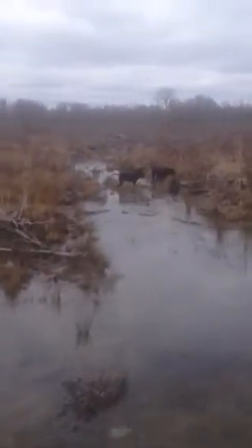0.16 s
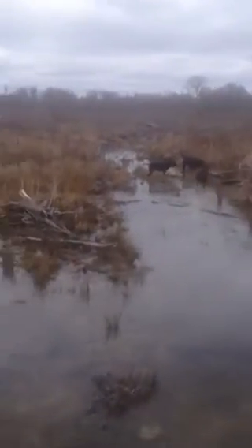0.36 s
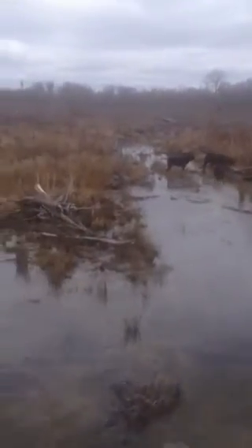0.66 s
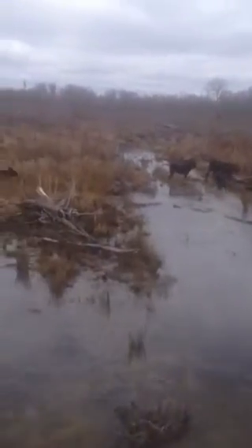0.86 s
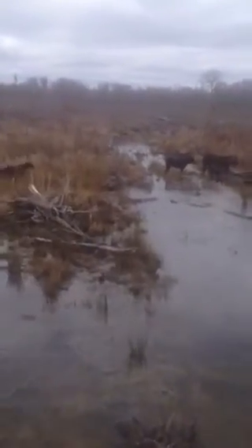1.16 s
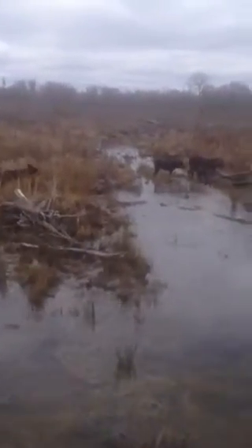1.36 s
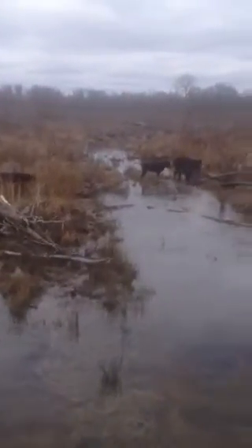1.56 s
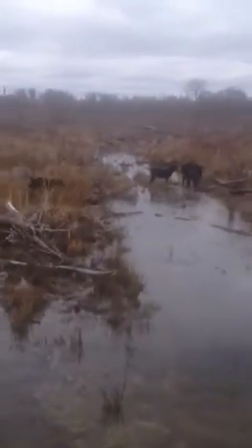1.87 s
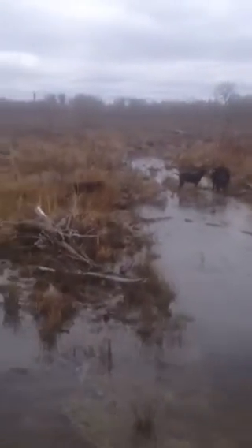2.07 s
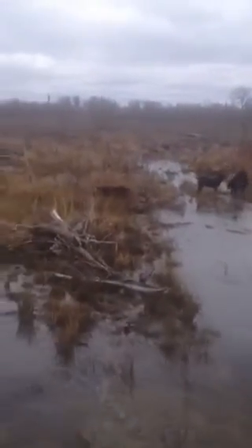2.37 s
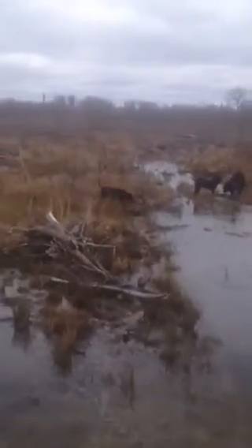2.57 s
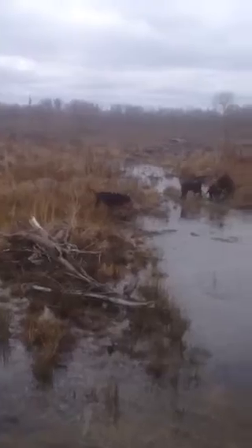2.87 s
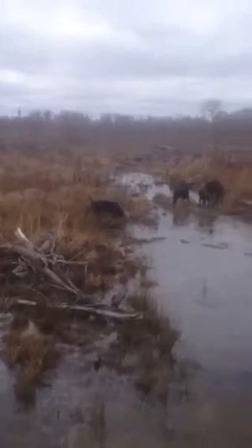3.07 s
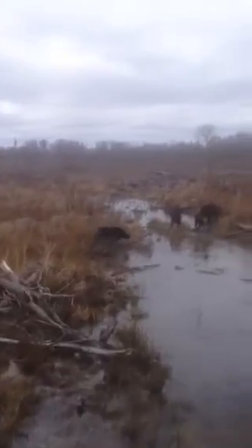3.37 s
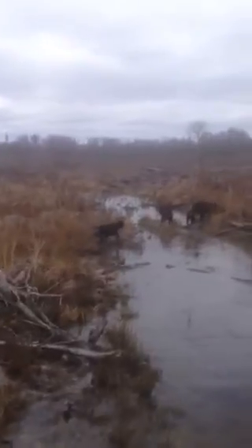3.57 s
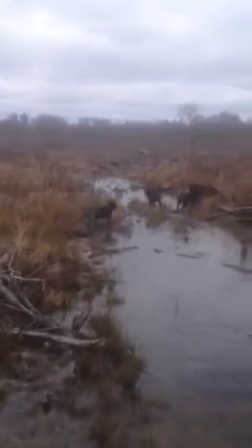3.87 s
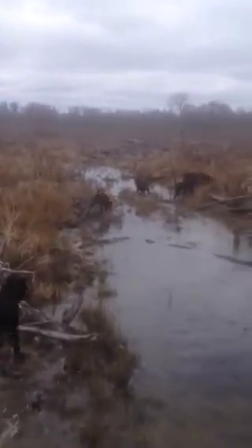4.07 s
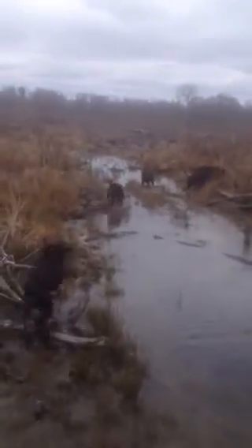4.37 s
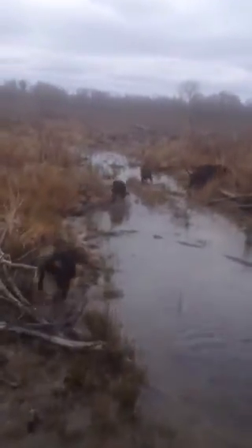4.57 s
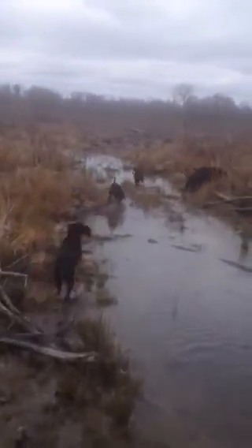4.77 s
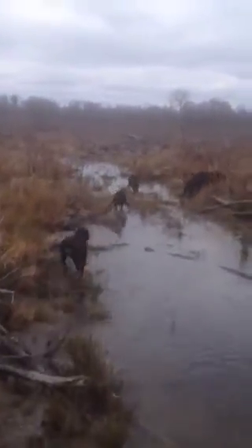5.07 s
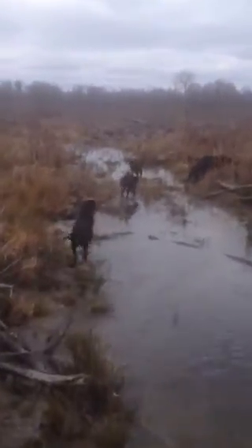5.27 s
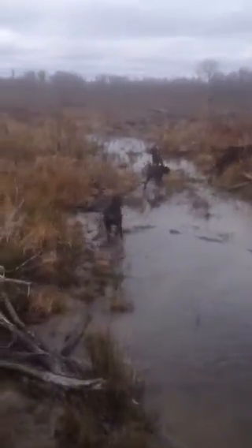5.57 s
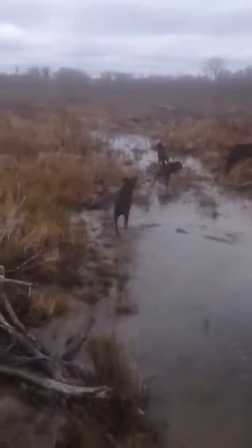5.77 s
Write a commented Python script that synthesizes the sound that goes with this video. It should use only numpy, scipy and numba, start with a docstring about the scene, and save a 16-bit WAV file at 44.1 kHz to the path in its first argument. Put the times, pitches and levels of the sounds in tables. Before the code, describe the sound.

Shallow water sloshes, plops and splashes under dogs' legs, swelling midway then easing, beneath a continuous shrill chorus of frogs.

```python
"""Frogs trill over softly sloshing water, then splashes grow as young dogs wade in a shallow marsh.
Churned water is banded noise that shifts with the legs, with small rising tones for bubbles and drops.
Trapped air plops as short ringing tones, and slaps of water are bursts of ragged coloured noise.
Frogs near and far call in rows of short pips around 3 kHz, like a nail drawn along a comb.
The upper partials of the far chorus blur into a faint steady band of noise just below 5 kHz."""
import sys
import numpy as np
from scipy import signal
from scipy.io import wavfile
from scipy.ndimage import uniform_filter1d
from numba import njit

SR = 44100
rng = np.random.default_rng(int(sys.argv[2]) if len(sys.argv) > 2 else 0)


def gain_from_db(level_db):
    """Turn a decibel level (scalar or array-like) into a linear amplitude factor."""
    decades = np.asarray(level_db, float) / 20
    return 10 ** decades


def persist_wave(psi):
    """Save psi, clipped to +-1, as 16-bit WAV."""
    counts = np.round(np.clip(psi, -1, 1) * 32767).astype(np.int16)
    wavfile.write(sys.argv[1], SR, np.atleast_2d(counts).T)


N = 261513  # length of the scene in samples
TIME = np.arange(N) / SR


@njit
def grains(at, size, hz, rise, glide, turn, power):
    """Short tones that swell to a peak at their time, die away and slide in pitch."""
    out = np.zeros(N)
    for k in range(len(at)):
        start = int((at[k] - rise[k]) * SR)
        phase = turn[k]
        for i in range(int(rise[k] * SR * (1 + 9 / np.sqrt(power)))):
            u = i / (rise[k] * SR)  # 0 at the start, 1 at the peak
            phase += 2 * np.pi * hz[k] * (1 + glide[k] * (u - 1)) / SR
            if 0 <= start + i < N:
                out[start + i] += size[k] * (u * np.exp(1 - u)) ** power * np.sin(phase)
    return out


def tones(at, db, hz, rise, glide, power):
    """Grains from plain columns, each at a chance phase; a higher power makes them shorter."""
    turn = 2 * np.pi * rng.random(len(at))
    columns = np.broadcast_arrays(at, gain_from_db(db), hz, rise, glide, turn)
    return grains(*(np.array(c, float) for c in columns), float(power))


def band(x, lo_hz, hi_hz):
    """Band-pass: keeps the sound between two pitches."""
    return signal.sosfilt(signal.butter(2, [lo_hz, min(hi_hz, .45 * SR)], "band", fs=SR, output="sos"), x)


def walk(rate):
    """Random levels, rate of them a second, smoothed twice into a wandering curve; spread near 1."""
    hold = int(SR / rate)
    steps = np.repeat(rng.standard_normal(N // hold + 1), hold)
    return 1.4 * uniform_filter1d(uniform_filter1d(steps, hold), hold)[:N]


def reeds(x, decay_s, wet_db):
    """Reeds and brush scatter the sound: a short dying tail of noise smears it."""
    t = TIME[:12000]
    tail = rng.standard_normal(len(t)) * np.exp(-t / decay_s) * (t > .002)
    tail = tail / np.sqrt(np.sum(tail ** 2))
    return x + gain_from_db(wet_db) * signal.fftconvolve(x, tail)[:N]


# How hard the legs churn the water. Each row: time in seconds, strength in dB.
CHURNING = [(0, -56.5), (.1, -63), (.38, -58), (.46, -49), (.87, -51.5), (.9, -60.5), (1.08, -61),
            (1.3, -56.5), (1.37, -48.5), (1.65, -51.5), (1.7, -61), (1.95, -61), (1.99, -55), (2.2, -51.5),
            (2.38, -47), (2.48, -55), (2.6, -50), (2.88, -46.5), (2.95, -43), (3.12, -41), (3.22, -48),
            (3.32, -44), (3.41, -50.5), (3.47, -43), (3.55, -44), (3.6, -50.5), (3.65, -44), (4.15, -45),
            (4.3, -55), (4.45, -59), (4.62, -61), (4.75, -47.5), (4.92, -50), (5.2, -64.5), (5.45, -63.5),
            (5.58, -52.5), (5.68, -49), (5.93, -49.5)]
# Where thud, slosh, wash and spray each rule alone. Each entry: pitch in Hz.
LAYER_HZ = [160, 480, 1500, 8000]
# Thud, slosh, wash and spray. Each row: level in dB at usual churning, change in dB per dB of churning.
LAYER_LEVELS = [(-65, -0.3), (-53, 0.8), (-46, 0.7), (-49, 1.0241)]
# Surges of water pushed by a leg. Each row: peak time in seconds, length in seconds, level in dB,
# centre pitch in Hz.
LEG_SURGES = [(0.025, .08, -41.5, 160), (0.202, 0.051, -43.5, 410), (0.293, 0.045, -48, 140),
              (0.503, 0.086, -40, 1300), (0.636, 0.078, -42.5, 980), (0.615, 0.14, -44, 158),
              (.85, 0.11, -62, 138), (1.113, 0.2, -52, 346), (1.4, 0.051, -45, 1780),
              (1.58, 0.12, -45.5, 1760), (1.368, 0.098, -39, 320), (1.479, 0.05, -36.5, 150),
              (1.893, 0.12, -41, 203), (2.022, 0.17, -46.5, 160), (2.462, 0.062, -43, 363),
              (2.63, .1, -47, 152), (2.14, 0.08, -43, 1020), (2.307, 0.11, -54, 1300),
              (2.873, 0.05, -39.5, 404), (3.04, 0.23, -45, 153), (3.166, 0.025, -32, 1330),
              (3.204, 0.093, -31, 300), (3.318, 0.031, -36, 152), (3.414, 0.04, -32.5, 176),
              (3.523, 0.056, -31.5, 390), (3.677, 0.091, -39, 396), (3.775, 0.12, -33.5, 180),
              (3.84, 0.065, -35.5, 300), (4.04, 0.12, -44.5, 1000), (4.116, 0.2, -54.5, 127),
              (4.35, .07, -45, 158), (4.54, 0.17, -48.5, 173), (4.717, .15, -56.5, 130),
              (5.005, .1, -57, 119), (5.38, 0.084, -58.5, 109), (4.51, 0.077, -40.5, 586),
              (4.663, 0.14, -47.5, 318), (4.854, 0.06, -47, 600), (5.176, .04, -54.5, 145),
              (5.378, .16, -44, 485), (5.585, 0.064, -47, 176), (5.685, 0.21, -47, 1280),
              (5.714, 0.12, -43, 495), (5.836, 0.048, -45, 700)]
# Colour of the water. Each row: pitch in Hz, level added to the layers in dB.
WATER_COLOUR = [(40, -14), (80, -9), (130, -4), (250, -5.5), (500, -3.5), (1000, -1.5), (2000, -1.5),
                (3200, 2.5), (5000, -2), (8000, -1.5), (12000, -6.5), (16000, -8)]


def churn_db(hz, s):
    """Slosh, wash and spray grow with the churning, the thud sinks a little, surges add power."""
    usual_churn_db, surge_octaves = -50, 0.65
    churn = np.interp(s, *np.transpose(CHURNING)) - usual_churn_db
    # each layer fades into its neighbours in pitch
    shares = [np.interp(np.log(hz), np.log(LAYER_HZ), row) for row in np.eye(len(LAYER_HZ))]
    power = 0
    for share, (db, slope) in zip(shares, LAYER_LEVELS):
        power = power + share * (db + slope * churn)
    power = gain_from_db(2 * power)  # doubling the dB turns amplitude into power
    for peak_s, length_s, db, centre_hz in LEG_SURGES:
        away_in_time = 2 * (s - peak_s) / length_s
        away_in_pitch = np.log2(hz / centre_hz) / surge_octaves
        power = power + gain_from_db(2 * db) * np.exp(-(away_in_time ** 2 + away_in_pitch ** 2))
    colour_hz, colour_db = np.transpose(WATER_COLOUR)
    return np.interp(np.log(hz), np.log(colour_hz), colour_db) + 10 * np.log10(power)


def rush():
    """Countless tiny impacts merge to noise; gouts shake all bands, each also flickers alone."""
    shared_db, own_db = 2.0, 2.3  # strength of the flicker
    out, gouts, coarse = 0, walk(60), TIME[::64]
    for hz in 40 * 2 ** (np.arange(27) / 3):  # third-octave bands
        noise = band(rng.standard_normal(N), hz / 1.12, hz * 1.12)
        flicker_db = shared_db * gouts + own_db * walk(24.11)
        level_db = np.interp(TIME, coarse, churn_db(hz, coarse)) + flicker_db
        out = out + noise / noise.std() * gain_from_db(level_db)
    return out


def bubbles(count=7200):
    """Small bubbles and drop impacts of all sizes rise in pitch, their level tied to the churning."""
    when, size, loud, long, rise = rng.random((count, 5)).T
    # they come in clumps, a handful from each gout of water
    clumps = np.repeat(when[::6], 6)[:count]
    s = (clumps + .004 * when * rise).clip(0, 1) * N / SR
    hz = 90 * (14000 / 90) ** size ** .75
    above_db = 3.6 * np.minimum(-np.log(loud), 3.3)  # a few stand out
    swell_s = (0.64 + 2.99 * long ** 2) / hz
    return tones(s, churn_db(hz, s) + above_db, hz, swell_s, 0.069 * rise, 1.34)


# Air pockets that ring. Each row: peak time in seconds, level in dB, pitch in Hz, length in cycles.
AIR_POCKETS = [(0.074, -36, 617, 8.0), (0.111, -29, 414, 4.6), (0.549, -33, 636, 7.8),
               (0.496, -21.5, 205, 0.9), (0.569, -22, 1660, 2.1), (0.669, -34, 142, 2.9),
               (0.8, -44, 140, 2), (0.855, -41, 140, 2), (0.905, -42.5, 140, 1.8), (0.98, -35, 750, 2.5),
               (1.051, -42.5, 141, 2.4), (1.074, -30, 523, 3.1), (1.349, -33, 340, 7.2),
               (1.388, -38, 430, 5.2), (1.473, -33, 142, 3.5), (1.498, -32, 447, 3.9),
               (1.545, -35, 565, 4.4), (1.589, -29.5, 860, 3.2), (1.853, -23, 190, 1.44),
               (1.982, -34.5, 179, 3.1), (2.022, -33.5, 159, 2.8), (2.06, -39, 160, 3.1),
               (2.113, -26, 590, 0.88), (2.24, -30.5, 644, 4.9), (2.306, -28, 1920, 4.9),
               (2.31, -34, 760, 6.9), (2.354, -43, 139, 2), (2.385, -30, 1670, 5.4), (2.443, -29, 384, 4.9),
               (2.469, -30.5, 370, 2.6), (2.599, -25, 2020, 2.73), (2.65, -31.5, 490, 3.6),
               (2.6, -14.5, 603, 2.26), (2.671, -17, 1100, 2.3), (2.674, -19, 1690, 3.2),
               (2.695, -22.5, 580, 2.16), (2.783, -29.5, 597, 4.8), (2.924, -27, 940, 6.7),
               (3.006, -21.5, 1010, 4.1), (3.087, -15.5, 1470, 3.8), (3.088, -5, 469, 2.6),
               (3.16, -21.5, 407, 2.1), (3.209, -33, 300, 6.6), (3.22, -28, 189, 1.83),
               (3.236, -20.5, 394, 4.5), (3.265, -26.5, 890, 3.4), (3.422, -25, 168, 3.3),
               (3.443, -25.5, 830, 3.6), (3.463, -27.5, 555, 7.2), (3.515, -17, 1820, 2.6),
               (3.517, -19, 406, 5.57), (3.65, -35, 350, 8), (3.743, -26, 169, 3.7),
               (3.807, -26.5, 510, 5.8), (3.863, -12.5, 218, 2.3), (3.882, -25, 670, 5.1),
               (3.955, -36, 140, 1.8), (4.085, -41, 160, 2.4), (4.332, -30.5, 1600, 8.0),
               (4.364, -32, 160, 2.34), (4.484, -29.5, 510, 4), (4.518, -32.5, 634, 8),
               (4.536, -37, 825, 3.4), (4.681, -37.5, 350, 8.7), (4.792, -29, 820, 2.6),
               (4.92, -36, 560, 6.3), (5.322, -30.5, 1270, 3), (5.354, -38.5, 620, 8.7),
               (5.383, -32, 526, 1.7), (5.421, -42, 335, 9.5), (5.636, -28, 1400, 2.6),
               (5.546, -29.5, 790, 3.4), (5.714, -31, 340, 2.1)]


def plops():
    """Large air pockets under a paw ring for a few cycles and rise as they reach the surface."""
    s, db, hz, cycles = np.transpose(AIR_POCKETS)
    return tones(s, db, hz, cycles / hz / 1.673, 0.051, 4.0)


# Slaps of thrown water. Each row: peak time in seconds, level before colouring in dB, length in ms.
WATER_SLAPS = [(0.5925, -33.5, 4), (0.768, -47, 9.1), (0.8623, -52, 3.2), (1.4205, -35, 2.2),
               (1.6277, -37, 6.4), (2.18, -33, 5), (2.389, -34, 7.6), (2.496, -36, 6.7), (2.524, -36, 3.4),
               (2.5995, -25, 2.6), (2.729, -30.5, 5.4), (2.921, -35, 20), (2.994, -25.5, 12),
               (3.086, -22.5, 7.6), (3.1, -33, 36), (3.4478, -29.5, 16), (3.519, -31.5, 44),
               (3.763, -32, 12), (3.879, -33.5, 23), (4.2096, -30.5, 2.3), (4.331, -42.5, 45),
               (4.5341, -36, 5.5), (4.633, -38.5, 15), (4.7483, -44, 9.5), (4.95, -36, 1.4),
               (5.065, -42, 6), (5.154, -43.5, 7.7), (5.298, -44, 12), (5.4113, -47, 7.7),
               (5.9022, -35.5, 3.4)]
# What a slap is made of. Each row: low edge in Hz, high edge in Hz, usual level added in dB.
SLAP_BANDS = [(300, 1140, -4), (1640, 4470, -3), (3440, 9200, -7), (7850, 16300, -9.5)]


def slaps(count=1500):
    """Bursts of ragged noise, each with its own colour; falling drops add many short ones."""
    when, loud = rng.random((count, 2)).T
    drop_s = when * N / SR
    above_db = 2.5 * np.minimum(-np.log(loud), 3.)
    drop_ms = 1. + 5. * rng.random(count) ** 3
    drop_db = churn_db(4700.0, drop_s) + above_db
    slap_s, slap_db, slap_ms = np.transpose(WATER_SLAPS)
    at, db, ms = np.r_[slap_s, drop_s], np.r_[slap_db, drop_db], np.r_[slap_ms, drop_ms]
    # drops vary more in colour than whole slaps
    spread_db = np.r_[np.full(len(slap_s), 2.5), np.full(count, 5.)]
    out = 0
    for lo_hz, hi_hz, part_db in SLAP_BANDS:
        tint_db = part_db + spread_db * rng.standard_normal(len(at)).clip(-3, 1.3)
        # a grain of no pitch is a bare swell and decay
        swell = grains(at, gain_from_db(db + tint_db), 0 * at, ms / 1000 / 2.93, 0 * at, 0 * at + np.pi / 2, 2.53)
        noise = band(rng.standard_normal(N), lo_hz, hi_hz)
        out = out + swell * noise / noise.std() * gain_from_db(2.5 * walk(400))  # the fast walk makes it ragged
    return out


# The tones within a pip. Each row: multiple of its pitch, level added in dB.
PIP_PARTIALS = [(.5, -18.), (1, 0.), (1.5, -30.)]


def frog(s, db, hz):
    """Each pip is a brief swell of the vocal sac, with faint partials below and above."""
    rise_s, glide = 0.0034, -.004  # the pitch sinks very slightly
    return sum(tones(s, db + part_db, hz * multiple, rise_s, glide, 4.9)
               for multiple, part_db in PIP_PARTIALS)


# Lone pips outside the calls. Each row: peak time in seconds, level in dB, pitch in Hz.
LONE_PIPS = [(1.9685, -27.5, 3300), (2.6934, -31.5, 3480), (3.082, -29, 3000), (3.1614, -26.5, 2890),
             (4.4464, -29, 3150), (4.562, -26.5, 3180), (4.619, -32, 3200), (4.634, -26.5, 3280),
             (5.048, -30.5, 3040), (5.6741, -33, 3410)]
# Calls of the nearer frogs. Each row: first pip in seconds, last pip in seconds, number of pips,
# each gap as a multiple of the one before.
NEAR_CALLS = [(-.2399, .6058, 10, 1.084), (-.134, .215, 5, 1.11), (.6788, 1.353, 8, 1.066),
              (.9657, 1.8838, 10, 1.068), (1.846, 2.567, 9, 1.077), (1.922, 2.3372, 5, 1.01),
              (3.113, 3.7824, 7, 1.03), (3.1548, 4.0157, 10, 1.092), (4.2668, 5.2412, 11, 1.0705),
              (4.4264, 5.1283, 8, 1.077), (4.984, 5.5586, 7, 1.055), (5.171, 5.581, 6, 1.08)]
# The voice of each call, in the same order. Each row: loudest level in dB, where in the call that falls
# as a share from 0 to 1, first pitch in Hz, last pitch in Hz.
CALL_VOICES = [(-25, 0.83, 2620, 3400), (-28, 0.68, 2940, 3080), (-30, 0.63, 2820, 3130),
               (-22.5, 0.45, 2895, 3220), (-28.5, 0.52, 2850, 3200), (-28.5, 0.48, 2840, 3000),
               (-29, 0.34, 3300, 2700), (-26.5, 0.7, 2600, 3380), (-19, 0.65, 2934, 3160),
               (-25, 0.43, 3080, 3200), (-24.5, 0.8, 3000, 3120), (-32.5, 0.94, 3200, 3430)]


def near_frogs():
    """Through a call each gap is a little longer, the voice swells and tires, the pitch shifts."""
    swell_db, tire_db = 29, 21.5  # loss a whole call before and after the loudest pip
    climb = 0.9  # under 1: the pitch moves faster early in a call
    rows = [np.transpose(LONE_PIPS)]
    for (first_s, last_s, pips, slowing), (db, loudest, first_hz, last_hz) in zip(NEAR_CALLS, CALL_VOICES):
        k = np.arange(pips)
        along = k / k[-1]
        s = first_s + (last_s - first_s) * (slowing ** k - 1) / (slowing ** k[-1] - 1)
        loss_db = np.where(along < loudest, swell_db, tire_db) * (along - loudest) ** 2
        rows.append([s, db - loss_db, first_hz + (last_hz - first_hz) * along ** climb])
    return frog(*np.hstack(rows))


# The far chorus thins out for a while. Each row: time in seconds, level added in dB.
CHORUS_LULL = [(2.0, 0.5), (2.6, -3), (4.3, 1)]


def far_chorus(frogs=8, middle_db=-39.5):
    """Distant frogs call over and over: through a call the pips slow down and climb."""
    call_s, rest_s = 1.25, .55
    first_gap_s, last_gap_s = .065, 0.14  # before each frog's own pace
    low_hz, high_hz = 2880, 3380  # before each frog's own pitch
    cycle_s = call_s + rest_s
    rows = []
    for offset, pace, pitch, near in rng.random((frogs, 4)):
        s = -offset * cycle_s
        while s < N / SR:
            along = (s + offset * cycle_s) % cycle_s / call_s  # above 1 the frog rests
            if along < 1:
                hz = (low_hz + (high_hz - low_hz) * along) * (.97 + .06 * pitch)
                rows.append((s, middle_db + 12 * (near - .5), hz))
            gap_s = first_gap_s + (last_gap_s - first_gap_s) * min(along, 1)
            s += gap_s * (.85 + .3 * pace)
    s, db, hz = np.transpose(rows)
    return frog(s, db + np.interp(s, *np.transpose(CHORUS_LULL)), hz)


def chorus_blur(level_db=-61, top_hz=4890):
    """The blurred upper partials of the far chorus: a faint steady noise band just below 5 kHz."""
    noise = band(rng.standard_normal(N), 3400., 6000.)
    noise = signal.sosfilt(signal.ellip(6, 1, 40, top_hz, fs=SR, output="sos"), noise)
    return noise / noise.std() * gain_from_db(level_db)


def scene():
    """Water close by, frogs near and far, and the blur of the far chorus."""
    frogs = reeds(near_frogs(), .03, -15.0) + reeds(far_chorus(), 0.076, -2.5)
    water = gain_from_db(-6) * rush() + bubbles()
    water = water + reeds(plops(), 0.0073, -7.5) + reeds(slaps(), 0.016, -19.0)
    return (water + frogs + chorus_blur())[None]


def roll_off(x):
    """The treble ends steeply here."""
    return signal.sosfilt(signal.butter(12, 15740, fs=SR, output="sos"), x)


def record(dry):
    """The phone adds its own faint noise, thins the deep bass and cuts the very top."""
    x = dry + gain_from_db(-64.5) * rng.standard_normal(N)
    x = signal.sosfilt(signal.butter(2, 70., "high", fs=SR, output="sos"), x)
    x = signal.sosfilt(signal.ellip(10, .2, 32, 15270, fs=SR, output="sos"), x)
    return roll_off(x)


dry = scene()
out = record(dry)
persist_wave(out)
```